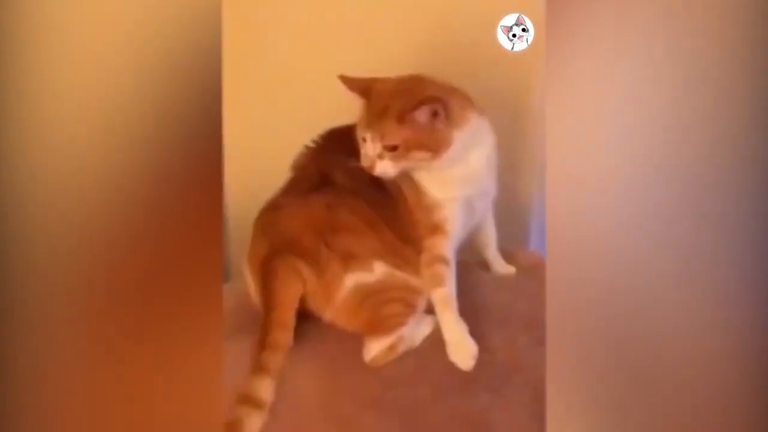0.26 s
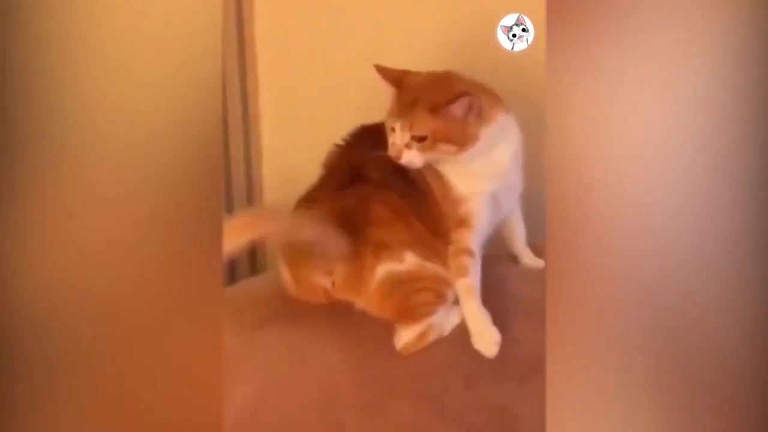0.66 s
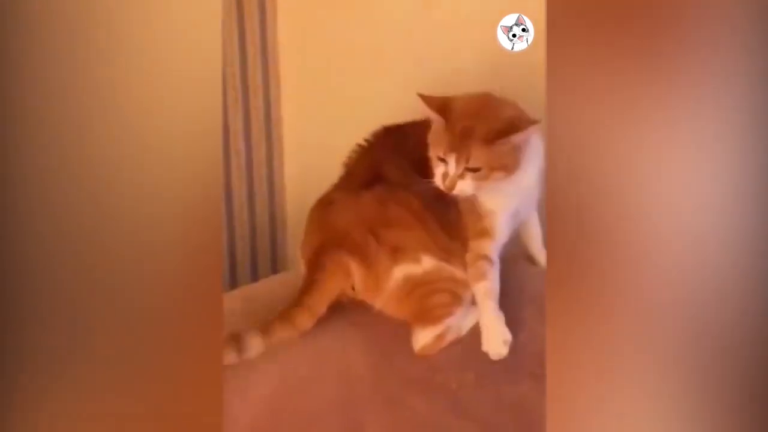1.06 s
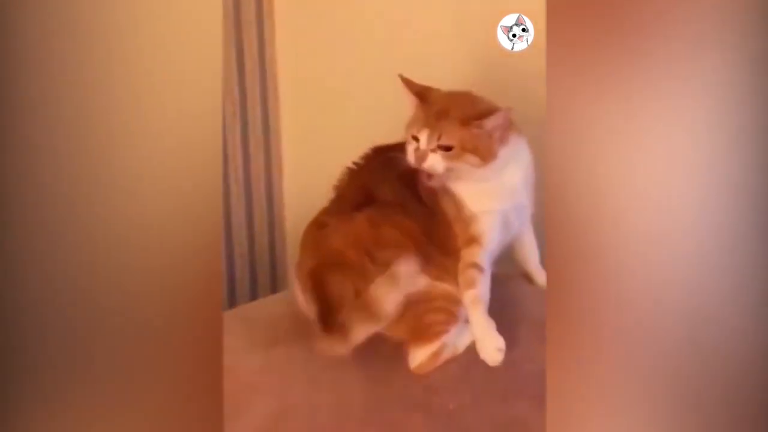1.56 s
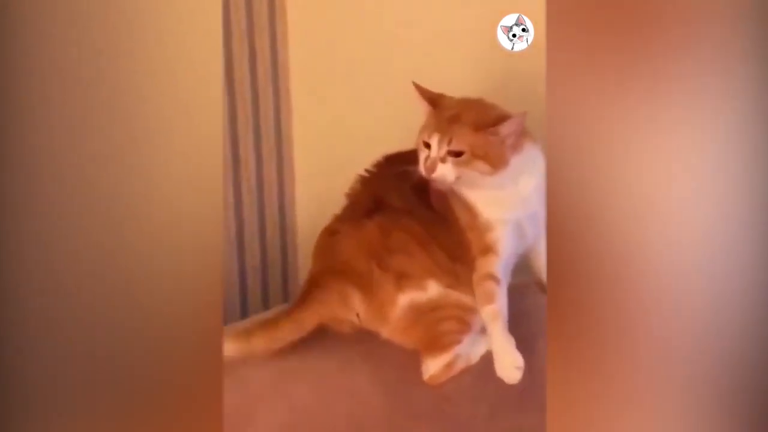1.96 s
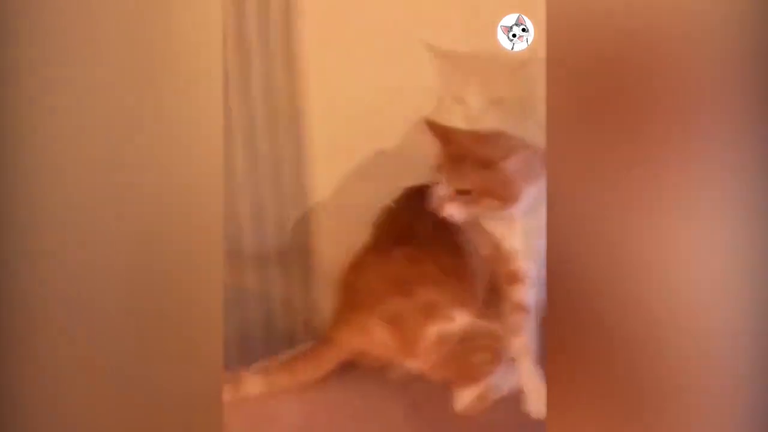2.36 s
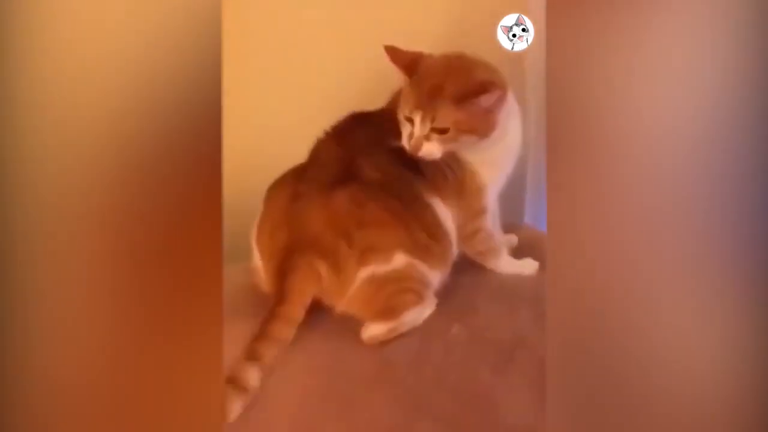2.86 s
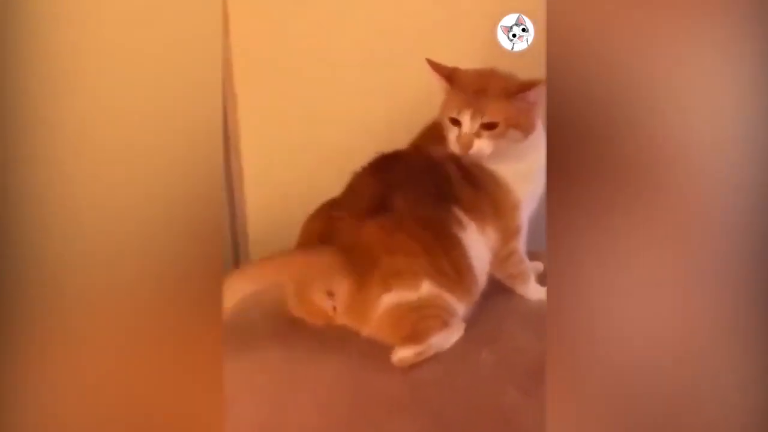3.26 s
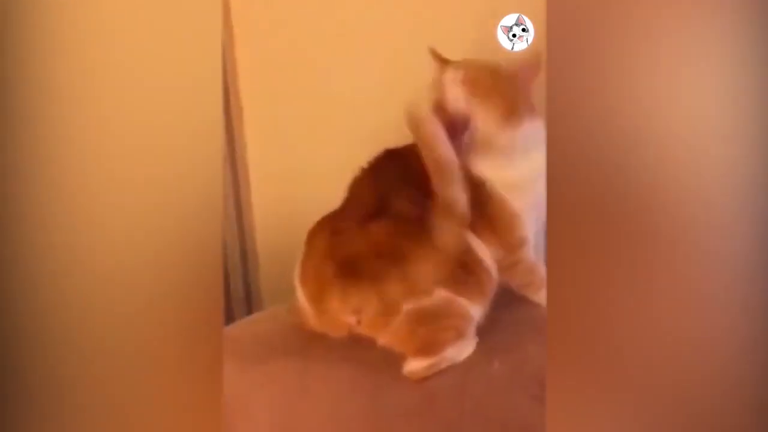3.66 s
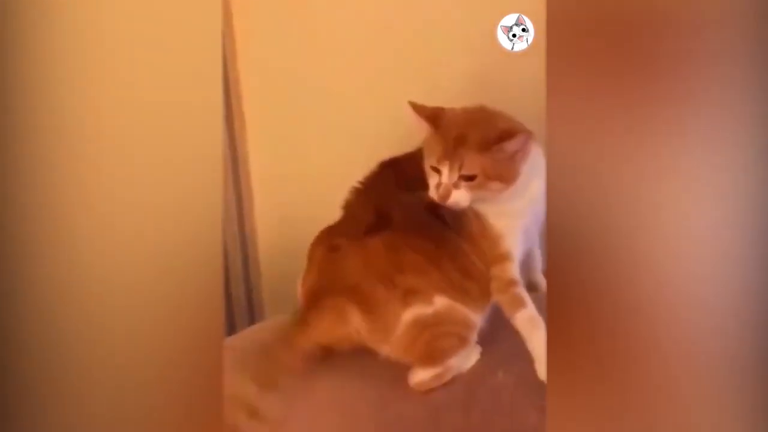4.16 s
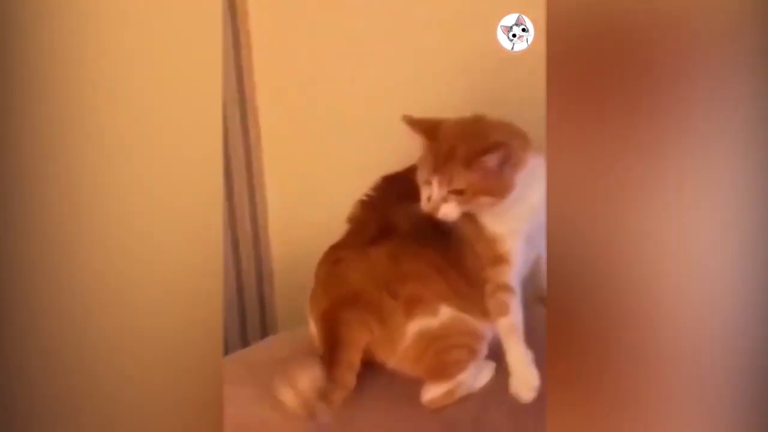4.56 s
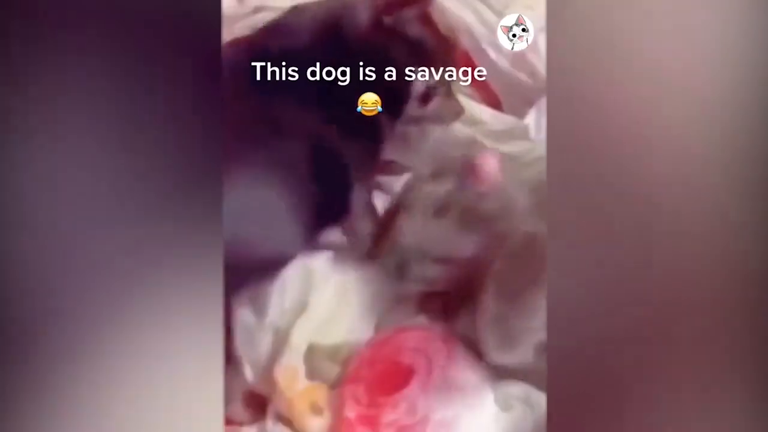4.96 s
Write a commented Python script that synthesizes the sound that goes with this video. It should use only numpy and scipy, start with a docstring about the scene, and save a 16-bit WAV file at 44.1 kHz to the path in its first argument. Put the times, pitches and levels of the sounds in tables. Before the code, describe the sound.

An agitated cat yowls, snarls, hisses and pants in a small room, then near silence and a sudden close rustle of crumpled wrapping.

```python
"""A cat yowls, growls, snarls and pants at its own tail in a small furnished room, over a faint room hush.
Vocal folds pulse into chest and mouth; pulsed noise, ringing at tongue and teeth, makes the hisses and pants.
Soft low thuds, decaying sine swells, fall among the cries.
The room drops by 45 dB to near silence; then the scene jumps to a loud rustling of wrapping close
to another microphone: grainy noise with a hollow and a squeak, over a low rumble of handling."""
import sys
import numpy as np
from scipy import signal
from scipy.fft import rfft, irfft, next_fast_len
from scipy.io import wavfile
from scipy.ndimage import uniform_filter1d

SR = 44100
rng = np.random.default_rng(int(sys.argv[2]) if len(sys.argv) > 2 else 0)


def generate_wav(sig):
    """Save sig (samples, or channels by samples) to the path in sys.argv[1] as 16-bit PCM at SR."""
    pcm = np.round(np.clip(np.atleast_2d(sig).T, -1, 1) * 32767).astype(np.int16)
    wavfile.write(sys.argv[1], SR, pcm)


N = 230246
T = np.arange(N) / SR


def amp(db):
    """Turns dB into a factor of amplitude."""
    return 10 ** (np.asarray(db) / 20)


def evened(x):
    """Scales the whole sound to rms 1."""
    return x / np.sqrt(np.mean(x ** 2) + 1e-20)


def smoothed(x, s):
    """Two running means, each over s seconds."""
    size = int(s * SR)
    return uniform_filter1d(uniform_filter1d(x, size), size)


def steadied(x, s):
    """Divides by a running rms smoothed over s seconds, so that a level curve can set the loudness."""
    return x / np.sqrt(abs(smoothed(x ** 2, s)) + 1e-12)


def read(points, hz):
    """Reads a curve of (frequency, value) points, straight on a log frequency axis."""
    f, value = np.transpose(points)
    return np.interp(np.log(hz + 1), np.log(f + 1), value)


def colour(x, points):
    """Filters by a spectrum of (frequency [Hz], gain [dB])."""
    n = next_fast_len(len(x), True)
    gain = amp(read(points, np.fft.rfftfreq(n, 1 / SR)))
    return irfft(rfft(x, n) * gain, n)[:len(x)]


def resonate(x, hz, width, count=1):
    """A moving resonance of gain 1: shifts the curve hz down to zero, smooths, and shifts back."""
    turn = np.exp(2j * np.pi * np.cumsum(hz * np.ones(N)) / SR)
    r = np.exp(-np.pi * width / SR)
    low = x * turn.conj()
    for _ in range(count):
        low = signal.lfilter([1 - r], [1, -r], low)
    return 2 * (turn * low).real


def steep(x, hz, width):
    """A resonance passed twice: dark valleys on both sides."""
    return resonate(x, hz, width, count=2)


def wander(s):
    """Slow chance of rms 1 that changes within about s seconds."""
    return evened(smoothed(rng.standard_normal(N), s))


def columns(tables):
    """Joins tables with time in front to one curve a column over all samples."""
    s, *rest = np.concatenate(tables).T
    return [np.interp(T, s, c) for c in rest]


def cries():
    """Each cry's mouth level, pitch, chest hum, mouth resonance and roughness over all samples."""
    # cries of the cat: (roughness at full voice [0-1], chest hum [dB], push of the chest at the onset [dB],
    #   points of (time [s], open-mouth level [dB], pitch [Hz], mouth resonance [Hz]))
    cry_table = [ (.15, -54, 32, [(0.0, -14, 333, 720), (0.03, -24, 360, 900), (0.096, -30, 383, 870),
                 (0.156, -18, 366, 1020), (0.2, -22, 345, 720), (0.236, -25, 322, 634)]),
                 (.12, -35, 2, [(0.272, -23, 307, 649), (0.356, -30, 285, 529), (0.418, -31.5, 243, 510)]),
                 (.45, -30, -6, [(0.494, -47, 188.5, 512), (0.62, -47, 165, 500), (0.68, -41, 160, 520),
                 (0.74, -45, 165, 472), (0.798, -37, 189, 871)]), (.55, -62, 30, [(0.815, -30, 260, 950),
                 (0.85, -25, 315, 950), (0.902, -33, 290, 970), (0.938, -31, 320, 1004),
                 (1.05, -83, 315, 915)]), (.95, -50, 0, [(1.45, -82, 391, 966), (1.542, -46, 422, 978),
                 (1.616, -42, 423, 940), (1.648, -58, 393, 1020), (1.72, -78, 390, 966),
                 (1.95, -80, 200, 700)]), (.06, -36, 16, [(1.968, -70, 185, 598), (1.985, -36, 191, 917),
                 (2.024, -38, 298, 963), (2.036, -19, 326, 984), (2.094, -17.5, 343, 1010),
                 (2.186, -22, 410, 760), (2.262, -17, 400, 1100), (2.32, -25, 389, 1150),
                 (2.39, -15, 375, 1160), (2.43, -25, 378, 1000)]), (.27, -31, 8, [(2.506, -31, 381, 702),
                 (2.546, -18.5, 311, 930), (2.598, -22, 360, 804), (2.672, -20.5, 327, 767),
                 (2.75, -20, 316, 910), (2.788, -19, 315, 708)]), (.04, -54, 26, [(2.815, -34, 302, 740),
                 (2.87, -12.5, 317.5, 944), (2.928, -28, 376, 1033), (2.992, -22, 360, 1040),
                 (3.03, -19, 325, 1030)]), (.58, -32, 0, [(3.09, -31, 290, 700), (3.136, -37, 255, 520),
                 (3.2, -48, 157, 599), (3.33, -46.5, 141, 550), (3.364, -37, 144, 839),
                 (3.39, -30, 165, 950), (3.43, -37, 200, 964)]), (.12, -62, 34, [(3.47, -30, 280, 1000),
                 (3.49, -23, 340, 1030), (3.51, -26, 395, 800), (3.54, -27, 400, 781),
                 (3.575, -42, 390, 800), (3.7, -71, 361, 960)]), (.2, -40, 16, [(3.83, -78, 187, 958),
                 (3.854, -21, 191, 975), (3.92, -51, 184, 948)]), (.6, -37, 11, [(3.95, -23, 184, 986),
                 (3.996, -47, 225, 711)]), (.02, -35, 0, [(4.076, -37, 271, 523), (4.19, -44, 267.5, 563),
                 (4.334, -54, 227.5, 521)]), (.45, -40, 14, [(4.375, -48, 210, 600), (4.395, -35, 204, 791),
                 (4.415, -23, 225, 900), (4.454, -20, 266.5, 983), (4.5, -30, 263, 927),
                 (4.536, -18, 252, 1014), (4.56, -32, 255, 955), (4.59, -26, 271, 670),
                 (4.658, -66, 278, 814), (4.7, -70, 251, 892)]), (.9, -44, 0, [(4.735, -47, 250, 800),
                 (4.77, -50, 250, 1000), (4.82, -80, 250, 900)])]
    rough_per_db = .012  # the weaker the voice within a cry, the rougher
    push_s = .07  # time constant of the onset push
    chest_over_mouth_db = 15  # caps the hum above the mouth's level
    tables = []
    for rough, chest_db, push_db, rows in cry_table:
        s, db, pitch_hz, mouth_hz = np.transpose(rows)
        pushed_db = chest_db + push_db * np.exp(-(s - s[0]) / push_s)
        hum_db = np.minimum(pushed_db, db + chest_over_mouth_db)
        roughness = rough + rough_per_db * (db.max() - db)
        tables.append(np.c_[s, db, pitch_hz, hum_db, mouth_hz, roughness])
    return columns(tables)


def bursts():
    """Each burst of air rises, holds and falls; the tongue glides during the hold; the loudest burst leads."""
    # hisses and pants: (time of full level [s], hold [s], level [dB], rise [dB/s], fall [dB/s],
    #   tongue resonance from [Hz], to [Hz], its ring [dB], treble above the rest at full level [dB])
    burst_table = [(0.024, .02, -14, 550, 200, 1520, 1700, 1, -14),
                   (0.055, .02, -13.5, 300, 400, 2300, 2300, 2, -16),
                   (0.09, .02, -16, 200, 240, 1880, 1860, 3, -16),
                   (0.3, .06, -46, 100, 200, 1600, 1540, 8, -14),
                   (0.514, .01, -57, 200, 60, 2000, 1900, 0, -4),
                   (0.79, .03, -55, 300, 100, 2500, 2500, 0, -2),
                   (0.858, .024, -14, 1000, 380, 1980, 1800, 4, -21),
                   (1.48, .04, -55, 700, 260, 2500, 2450, -3, 0),
                   (1.56, .07, -49, 100, 260, 2500, 2340, -8, 0),
                   (1.75, .1, -57, 300, 100, 2594, 2500, 10, 4),
                   (1.985, .03, -48, 900, 200, 2600, 2650, 0, 4),
                   (2.05, .03, -30, 500, 60, 2720, 2600, 9, -9.5),
                   (2.28, .04, -17, 450, 250, 2000, 1980, -3, -17),
                   (2.35, .04, -20, 200, 300, 2600, 2500, 3, -13),
                   (2.572, .03, -20.5, 500, 200, 2030, 2050, -8, -11),
                   (2.636, .01, -16, 200, 200, 2130, 2050, -4, -14),
                   (2.9, .03, -13, 480, 200, 1950, 1930, 4, -16),
                   (3.36, .08, -47, 500, 200, 2720, 2800, 0, -7),
                   (3.492, .046, -12.5, 900, 380, 1950, 2150, 0, -16),
                   (3.76, .01, -56, 300, 200, 2200, 2250, 0, 2),
                   (3.815, .01, -47, 300, 300, 2400, 2460, 8, -4),
                   (3.858, .004, -13, 1000, 750, 2240, 2250, -2, -12),
                   (3.944, .004, -34, 500, 450, 1880, 1900, -1, -7),
                   (4.132, .05, -62.5, 90, 40, 2500, 2400, 0, 0),
                   (4.43, .025, -13, 1050, 400, 1730, 1880, 1, -15),
                   (4.492, .006, -8, 420, 620, 2290, 2290, 6, -19),
                   (4.53, .02, -31, 200, 500, 2290, 2290, -8, -3),
                   (4.6, .04, -55, 200, 100, 2250, 2200, -2, -5),
                   (4.76, .04, -58, 200, 130, 1300, 1250, 0, 2)]
    linger_db, linger_db_per_s = -21, 135  # a weaker, slower trail after the fast-falling bursts
    seep_db = -76  # least air between the bursts
    treble_per_db = -.1  # the treble fades more slowly than the rest
    t = T[::64]  # coarse control times
    s, hold, db, rise, fall, from_hz, to_hz, ring_db, treble_db = np.transpose(burst_table)[:, :, None]
    after = np.maximum(t - s - hold, 0)
    fall_db = np.maximum(-fall * after, linger_db - linger_db_per_s * after)
    shape_db = db + fall_db - rise * np.maximum(s - t, 0)
    tongue_hz = from_hz + (to_hz - from_hz) * np.clip((t - s) / (hold + 1e-3), 0, 1)
    lead = np.argmax(shape_db, axis=0), np.arange(len(t))
    level_db = np.maximum(shape_db, seep_db)
    faded_treble_db = treble_db + treble_per_db * (level_db - db)
    each = level_db, tongue_hz, faded_treble_db, ring_db + 0 * t
    return [np.interp(T, t, uniform_filter1d(c[lead], size=4)) for c in each]


def cat():
    """Vocal folds pulse into chest and mouth; air hisses past tongue and teeth, pulsed at the same pitch."""
    # spectrum of air at the teeth: (frequency [Hz], relative level per Hz [dB])
    teeth = [(180, -60), (300, -12), (684, -9), (778, -25.5), (974, -12), (1440, -7.5), (2330, -5.5),
             (2560, -5), (5000, -22), (6500, -69), (11000, -120)]
    # spectrum of the sharp treble hiss: (frequency [Hz], relative level per Hz [dB])
    sibilance = [(2470, -4.5), (4200, -4), (4570, -8.5), (5710, -3.5), (6180, -27), (6680, -8.5),
                 (8080, -10.5), (11100, -25), (13200, -23), (16000, -49.5)]
    # cavities of the head: (frequency [Hz], width [Hz], level against the sharp hiss [dB])
    palate = [(5000, 500, -6), (5600, 400, -10), (6150, 350, -6)]
    chest_quits_db, chest_drop = -20, 2  # above this level of air the hum drops so many dB for each dB
    mouth_db, pitch_hz, chest_db, mouth_hz, rough = cries()
    air_db, tongue_hz, treble_db, ring_db = bursts()
    chest_db = chest_db - chest_drop * np.maximum(air_db - chest_quits_db, 0)
    rough = np.clip(rough, .1, 1)

    # rougher folds waver more in pitch
    jitter = (.012 + .07 * rough) * wander(.006)
    turns = np.cumsum(pitch_hz * (1 + jitter)) / SR
    # each harmonic swells and fades at its own times
    shimmer = amp(3.2 * wander(.014))
    folds = evened(sum(np.roll(shimmer, 5000 * k) * np.cos(2 * np.pi * k * turns) for k in range(1, 20)))
    folds = folds * (1 + 1.78 * rough * np.cos(np.pi * turns))  # strained folds alternate strong and weak pulses
    puffs = evened((1.2 + np.exp(-(turns % 1) / 0.34)) * rng.standard_normal(N))

    flutter = amp(2.2 * wander(.008))  # the folds close unevenly
    drive = (1 - rough) * folds + 1.4 * rough * puffs
    opening = resonate(steep(drive, mouth_hz, 480), mouth_hz, 600)
    mouth = steadied(opening * flutter, 0.053)
    hum = np.sqrt(2) * np.cos(2 * np.pi * turns)
    growl = evened(steep(puffs, pitch_hz, 130))
    chest = (1 - rough) * hum + 1.3 * rough * growl
    chest_level = amp(chest_db + (1.0 + 2.1 * rough) * wander(0.0085))
    voice = amp(mouth_db) * mouth + chest_level * chest

    jet = puffs + 2.4 * (1 - rough) ** 1.5 * folds
    jet = jet * amp(3.8 * wander(0.0066))
    head = [amp(db) * evened(steep(jet, hz, width)) for hz, width, db in palate]
    body = evened(colour(jet, teeth)) + amp(ring_db) * evened(steep(jet, tongue_hz, 320))
    body = body + amp(-8) * evened(steep(jet, 1.378 * tongue_hz, 1000))  # the next mode moves with the tongue
    treble = steadied(evened(colour(puffs, sibilance)) + sum(head), 0.01)
    air = steadied(body, 0.01) + amp(treble_db) * treble
    return voice + amp(air_db) * air


def hush():
    """The room's constant air: coloured noise, lumpy in the bass, its level wavering a little."""
    # spectrum of the room's air: (frequency [Hz], relative level per Hz [dB])
    air_spectrum = [(15, -61.5), (25, -21.5), (117, -13), (170, -6), (212, -2), (256, -21.5), (301, -8),
                    (503, -15), (695, -21), (1840, -28), (14000, -47), (16000, -50)]
    level_db = -50 + 2.7 * wander(0.01)
    return amp(level_db) * evened(colour(rng.standard_normal(N), air_spectrum))


def room(x):
    """Echoes as sparse taps of random sign, one in every 20 samples, each band dying at its own speed."""
    # decay of the room: (frequency [Hz], time to fall by 60 dB [s])
    decay = [(200, 0.43), (1000, 0.33), (3000, 0.24), (10000, 0.083)]
    taps = np.zeros(SR // 2)
    at = np.arange(300, SR // 2 - 20, 20)
    taps[at + rng.integers(0, 20, len(at))] = rng.choice([-1., 1.], len(at))
    hz, t, z = signal.stft(taps, SR, nperseg=256)
    dying = z * amp(-60 * t / read(decay, hz)[:, None])
    echo = signal.istft(dying, SR, nperseg=256)[1]
    return signal.fftconvolve(x, echo / np.linalg.norm(echo))[:N]


def thuds():
    """Each soft low thud is a sine that swells for 15 ms and then dies away."""
    # soft low thuds: (time [s], level, 6 dB above the envelope's peak [dB], pitch [Hz])
    thud_table = [(.149, -36, 48), (0.998, -40.5, 45), (1.79, -45, 48), (2.36, -36, 45.23),
                  (2.489, -24, 148.9), (3.339, -50, 45), (4.452, -58, 40.12), (4.529, -46, 44.4)]
    out, t = np.zeros(N + 8000), np.arange(8000) / SR
    swell = t / 0.03 * np.exp(1 - t / 0.015)
    for s, db, hz in thud_table:
        out[round(s * SR):][:8000] += amp(db) * np.sin(2 * np.pi * hz * t) * swell
    return out[:N]


def rustle():
    """Wrapping crumples in uneven grains over the rumble of a handled microphone."""
    # course of the rustle: (time [s], wrapping level [dB], rumble level [dB],
    #   hollow of the wrapping [Hz], squeak against the wrapping [dB])
    crumpling = [(4.98, -25.5, -30, 1950, -25), (4.998, -23.5, -24.5, 2080, -26),
                 (5.074, -15.5, -21, 2020, -5), (5.116, -14.5, -30, 1690, -30),
                 (5.152, -26.5, -26.5, 1790, -39), (5.19, -32.5, -40, 1780, -24),
                 (5.221, -23, -10, 1740, -36)]
    # spectrum of the wrapping: (frequency [Hz], relative level per Hz [dB])
    wrapping = [(180, -20), (300, -5), (392, -36.5), (574, -21), (634, -12), (774, -3.5), (1060, -1),
                (1300, -6), (1690, 1.5), (2140, 2), (3950, -9.5), (6100, -11.5), (6620, -18.5),
                (12900, -27), (16000, -38)]
    # spectrum of the handling: (frequency [Hz], relative level per Hz [dB])
    handling = [(15, -46), (25, -20), (75, 0), (168, -5.5), (221, -13), (299, -12.5), (500, -15.5),
                (650, -19), (1100, -120)]
    wrap_db, rumble_db, hollow_hz, squeak_db = columns([crumpling])
    grains = rng.standard_normal(N) * amp(1.2 * wander(0.0021))
    hollow = amp(-9) * evened(steep(grains, hollow_hz, 450))
    wrap = evened(colour(grains, wrapping)) + hollow
    squeak = amp(squeak_db) * evened(steep(grains, 6060, 330))
    rumble = amp(rumble_db) * steadied(colour(rng.standard_normal(N), handling), 0.062)
    return amp(wrap_db) * (wrap + squeak) + rumble


def scene():
    """The cat in its room fades to near silence, then the rustle takes over at once."""
    # the near silence: (end of the fade [s], start of the rustle [s])
    silence = (4.915, 4.982)
    near = colour(cat(), [(80, -34), (135, 0.5)])  # the deep bass falls away below about 130 Hz
    first = near + amp(-13.5) * room(near) + thuds() + hush()
    fade = np.clip((silence[0] - T) / .01, amp(-45), 1)
    return np.where(T < silence[1], first * fade, rustle())[None]


def record(dry):
    """Soft overload of the loudest peaks, then the band limit."""
    edge_hz = 15800
    overloaded = np.tanh(dry / 1.024) * 1.164
    lowpass = signal.firwin(511, edge_hz, window=("kaiser", 9), fs=SR)
    return signal.oaconvolve(overloaded, lowpass[None], "same")


dry = scene()
out = record(dry)
generate_wav(out)
```